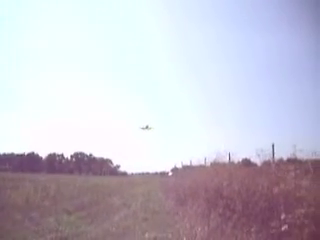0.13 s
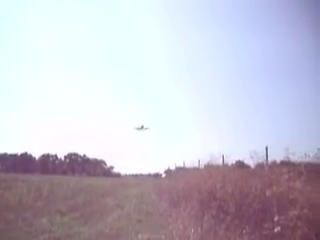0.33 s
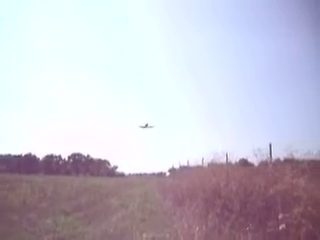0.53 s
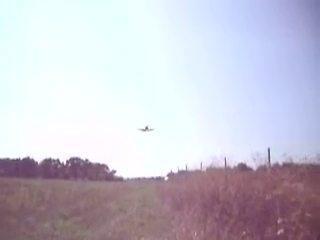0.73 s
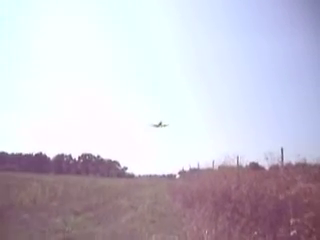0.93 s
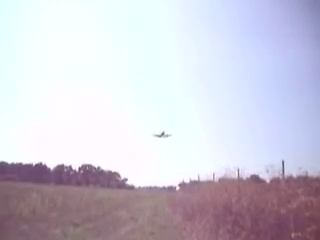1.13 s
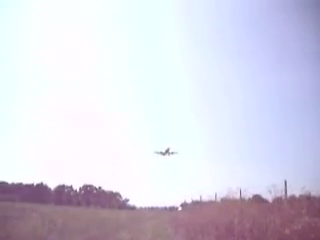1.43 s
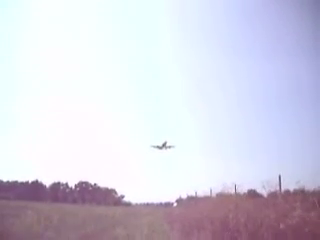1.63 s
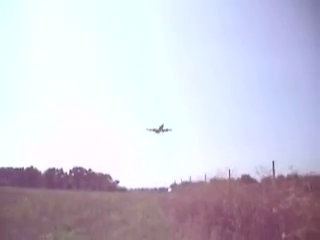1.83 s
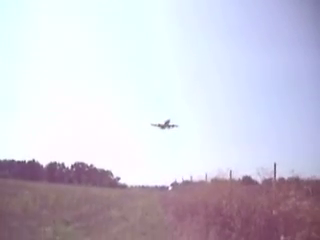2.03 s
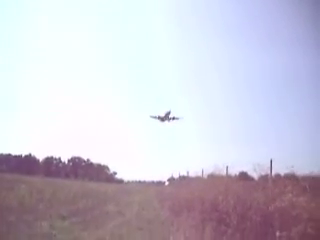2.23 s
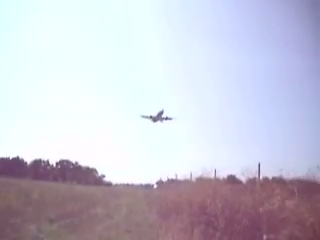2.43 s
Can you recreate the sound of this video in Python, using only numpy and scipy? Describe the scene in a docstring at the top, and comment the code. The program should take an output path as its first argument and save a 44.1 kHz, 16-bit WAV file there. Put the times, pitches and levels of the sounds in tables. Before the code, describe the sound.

A jet airliner approaches low over open grass with a deep rumble, a hissing roar and faint steady engine tones. The roar eases over the first half second, then swells from about 1.7 seconds, with a hollow sweep sliding downward. A high fan whine comes through around 2.4 seconds. Three faint, dry ticks fall between 2 and 2.6 seconds. The small microphone makes the jet sound dull.

```python
"""On open grass, a jet airliner comes in low toward the listener, about to land.
Swirling exhaust rumbles, and air churned by the engines and body roars and hisses. The roar eases at
first, then all three swell as the jet nears. Sound bouncing off the field cancels some pitches, and
these gaps slide down as the jet looms higher. The whine of the fan blades comes through at the end.
A small, dull microphone picks up the jet. Three faint, dry ticks are heard near the end."""
import sys
import numpy as np
from scipy import signal
from scipy.fft import rfft, irfft
from scipy.io import wavfile
from scipy.ndimage import uniform_filter1d, map_coordinates

SR = 44100
rng = np.random.default_rng(int(sys.argv[2]) if len(sys.argv) > 2 else 0)


def persist_wave(psi):
    """Save psi, clipped to +-1, as 16-bit WAV."""
    counts = np.round(np.clip(psi, -1, 1) * 32767).astype(np.int16)
    wavfile.write(sys.argv[1], SR, np.atleast_2d(counts).T)


N = 114660  # 2.6 s


def undb(db):
    """Turn decibels into a number to multiply by."""
    return 10 ** (np.asarray(db) / 20)


def noise(gain):
    """Random noise of strength 1 (rms); the function gain sets each frequency's share."""
    hz = np.arange(N // 2 + 1) * SR / N + 1e-3
    shaped = irfft(rfft(rng.standard_normal(N)) * gain(hz), N)
    return shaped / shaped.std()


def churning_air(spectrum, low_hz, high_hz):
    """The noise of churning air, shaped by (f/Hz, level/dB) rows and kept between two frequencies."""
    hz, db = np.array(spectrum).T

    def gain(f):
        shape = undb(np.interp(np.log(f), np.log(hz), db, right=-120))
        return shape / np.sqrt((1 + (low_hz / f) ** 24) * (1 + (f / high_hz) ** 24))
    return noise(gain)


# How loud each band (range of pitches) is as the jet nears. Columns: t/s, then level/dB for
# bands 0-5: deep rumble, upper rumble, low roar, middle roar, high roar, fan hiss
BAND_LEVELS = [(0, -23.5, -27.0, -22, -15, -19.5, -32), (0.12, -25, -27, -25.0, -18.5, -24, -32.5),
               (0.3, -21.5, -30, -27.5, -24, -25.5, -33), (0.5, -21.5, -30.5, -27.5, -24.5, -26.5, -35.5),
               (0.75, -24, -30, -28.5, -25.5, -27.5, -37), (0.95, -20.5, -27.5, -28.5, -25, -25, -34.0),
               (1.28, -22.5, -25.5, -30.5, -25.5, -23, -32), (1.52, -19.5, -26.5, -30, -27.0, -23, -38.5),
               (1.7, -18, -25.5, -28, -28.5, -26, -31.5), (1.9, -16, -26.5, -27.5, -27.5, -27.5, -28.5),
               (2.15, -17.5, -23.5, -23, -23.5, -27.5, -27), (2.38, -17, -24.5, -21.5, -20, -27, -28.5),
               (2.58, -16.5, -21.5, -20, -18.5, -20.5, -23)]
def ease_and_swell(sound, t, band):
    """Even out a noise over quarter seconds, then make it follow its band's loudness."""
    rows = np.array(BAND_LEVELS)
    steady = sound / np.sqrt(uniform_filter1d(sound ** 2, size=SR // 4))
    return steady * undb(np.interp(t, rows[:, 0], rows[:, band + 1]))


# The mix of pitches in the exhaust rumble. Columns: f/Hz, relative level/dB
RUMBLE_SPECTRUM = [(15, -38.5), (28, -19), (42, -9), (62, -2), (82, -8), (100, -1), (130, -.5), (165, -5.5),
                   (205, -10), (255, -10.5), (320, -16.5), (450, -28)]
def exhaust_rumble(t):
    """Big swirls in the exhaust make a deep rumble and an upper one."""
    split_hz = 170
    deep = churning_air(RUMBLE_SPECTRUM, 0, split_hz)
    upper = churning_air(RUMBLE_SPECTRUM, split_hz, SR)
    return ease_and_swell(deep, t, band=0) + ease_and_swell(upper, t, band=1)


# Where the low roar, middle roar, high roar and fan hiss begin. One column: f/Hz
ROAR_EDGES_HZ = [330, 850, 1650, 2750]
# The mix of pitches in the roar and hiss. Columns: f/Hz, relative level/dB
ROAR_SPECTRUM = [(250, -1), (400, -2.5), (540, 0), (700, -3), (850, -1.5), (960, 4), (1060, 0.5), (1160, 0),
                 (1400, -0.5), (1900, 0), (2300, -3), (2600, -4.5), (2750, -7), (3000, -8.5), (3250, -6.5),
                 (3550, -6), (3800, -13.5), (4050, -21.5), (4300, -30), (4600, -48.5)]
def roar_and_hiss(t):
    """Air churned by the engines and body, heard both directly and off the grass."""
    out = np.zeros(N)
    ranges_hz = zip(ROAR_EDGES_HZ, ROAR_EDGES_HZ[1:] + [SR])
    for band, (low_hz, high_hz) in enumerate(ranges_hz, start=2):
        rush = churning_air(ROAR_SPECTRUM, low_hz, high_hz)
        out += ease_and_swell(add_grass_bounce(rush, t), t, band)
    return out


# How strongly the field bounces sound back. Columns: t/s, share (0 to 1)
GRASS_BOUNCE = [(0, .1), (.9, .28), (1.55, .52), (2.2, .56), (2.6, .36)]
def add_grass_bounce(sound, t):
    """The grass adds a dull, upside-down copy of the wave, which lags more as the jet looms higher."""
    jet_speed_m_s, sound_speed_m_s = 66, 343
    start_m, altitude_m, mic_height_m = 450, 60, 0.78
    distance_m = np.hypot(start_m - jet_speed_m_s * t, altitude_m)
    lag_s = 2 * mic_height_m * altitude_m / distance_m / sound_speed_m_s
    share = np.interp(t, *np.array(GRASS_BOUNCE).T)
    dulled = uniform_filter1d(sound, size=9)
    delayed = map_coordinates(dulled, [(t - lag_s) * SR], order=1, mode="mirror")
    return sound - share * delayed


def blurred_tone(hz, width_hz):
    """A tone smeared over nearby pitches by its trip through moving air."""
    return noise(lambda f: np.exp(-2 * ((f - hz) / width_hz) ** 2))


# The faint tones of the engines. Columns: f/Hz, width/Hz, level/dB
ENGINE_TONES = [(1066, 44, -35), (1557, 33, -42.5), (544, 28, -44.5), (3220, 130, -43.5)]
def engine_tones(t):
    """The engines sing faintly the whole time, and their tones bounce off the grass too."""
    tones = sum(undb(db) * blurred_tone(hz, width_hz) for hz, width_hz, db in ENGINE_TONES)
    return add_grass_bounce(tones, t)


def fan_whine(t):
    """The whine of the spinning fan blades rises out of the hiss as the jet gets close."""
    full_db, full_at_s, rise_db_per_s = -21, 2.56, 65
    level_db = full_db - rise_db_per_s * np.maximum(full_at_s - t, 0)
    return blurred_tone(hz=3236, width_hz=420) * undb(level_db)


# Three faint, dry ticks near the end. Columns: t/s, level/dB (before softening)
FAINT_TICKS = [(2.0208, -21), (2.4925, -28), (2.579, -28)]
def faint_ticks():
    """Each tick is one sharp spike with its highest pitches softened."""
    soft_above_hz = 6000
    spikes = np.zeros(N)
    for at_s, db in FAINT_TICKS:
        spikes[int(at_s * SR)] = undb(db)
    return signal.lfilter([1], [1, -np.exp(-2 * np.pi * soft_above_hz / SR)], spikes)


def scene():
    """All the sounds of the approaching jet, added into one channel."""
    t = np.arange(N) / SR
    return (exhaust_rumble(t) + roar_and_hiss(t) + engine_tones(t) + fan_whine(t))[None]


def record(dry):
    """The small microphone rounds off the peaks and cuts the high pitches; then faint ticks are added."""
    drive, mic_top_hz, overall_top_hz = 0.84, 4500, 15800
    mic_filter = signal.ellip(10, 0.2, 85, mic_top_hz, fs=SR, output="sos")
    overall_filter = signal.ellip(8, 0.2, 70, overall_top_hz, fs=SR, output="sos")
    rounded = np.tanh(drive * dry) / drive
    dull = signal.sosfilt(mic_filter, rounded)
    return signal.sosfilt(overall_filter, dull + faint_ticks())


dry = scene()
out = record(dry)
persist_wave(out)
```